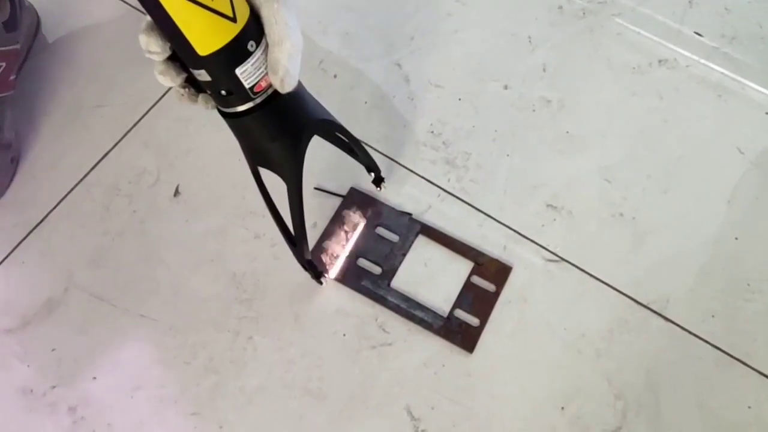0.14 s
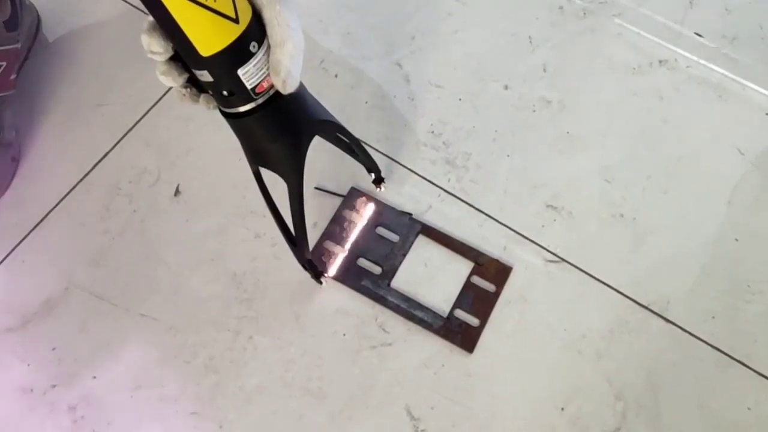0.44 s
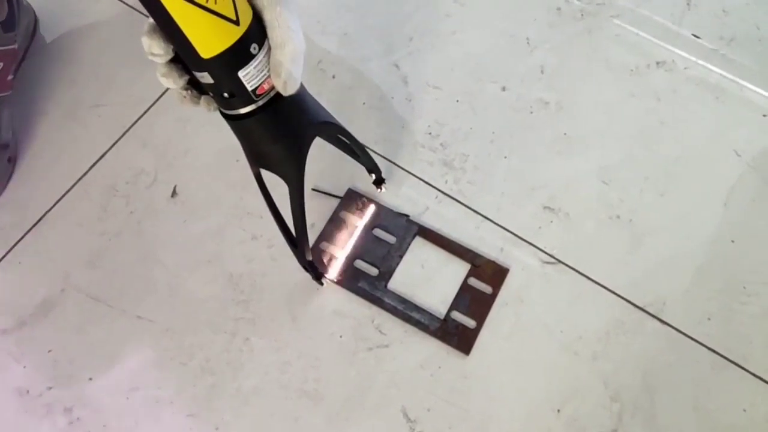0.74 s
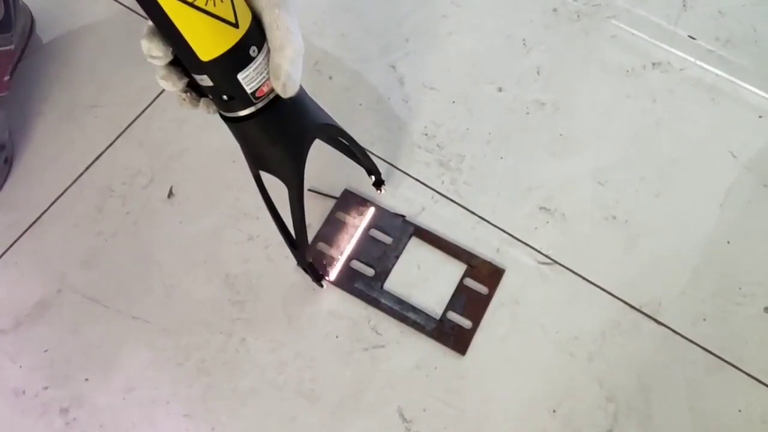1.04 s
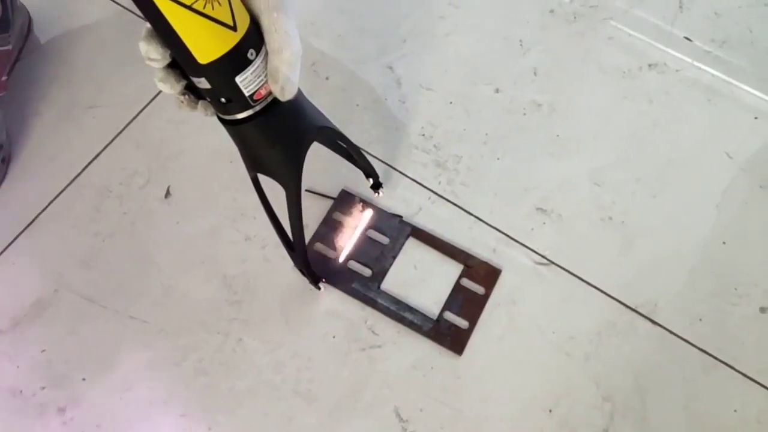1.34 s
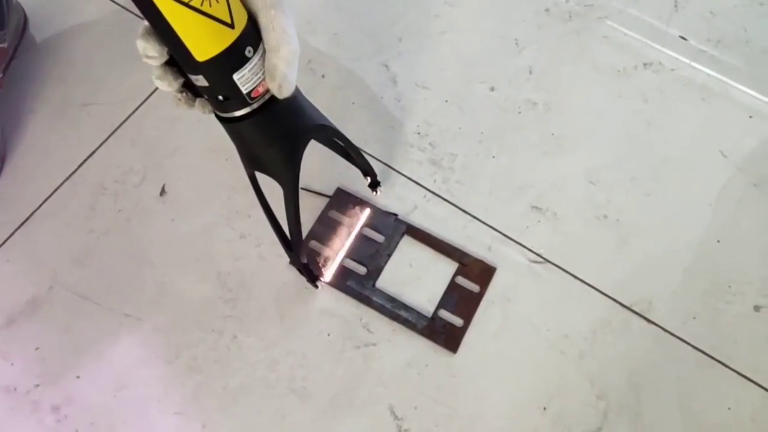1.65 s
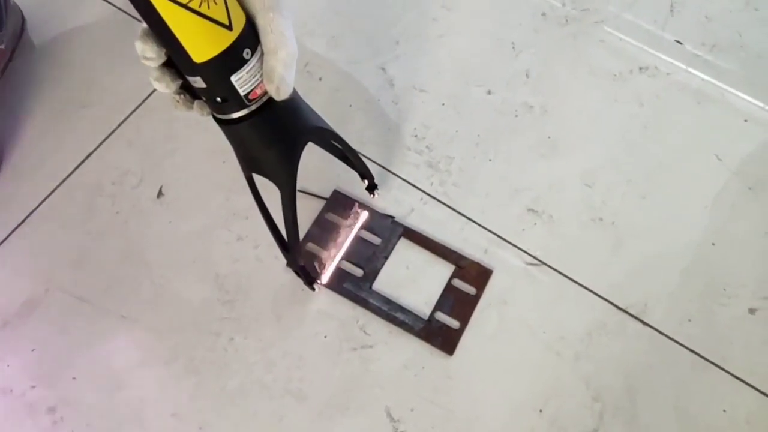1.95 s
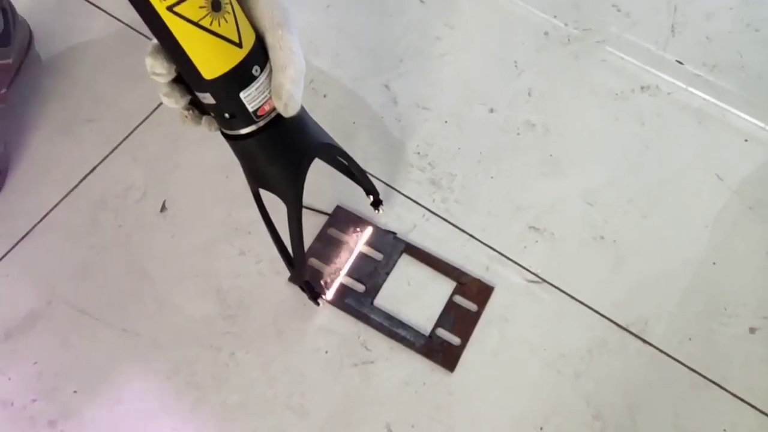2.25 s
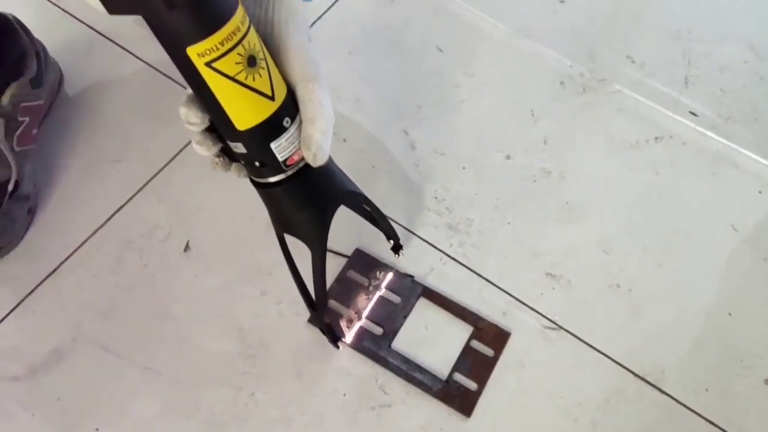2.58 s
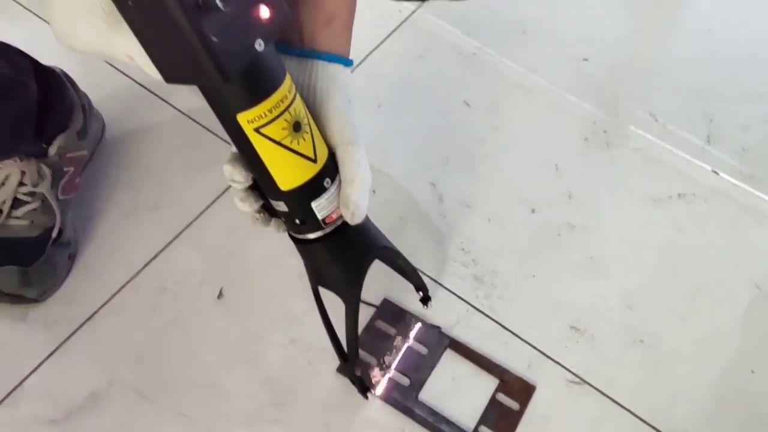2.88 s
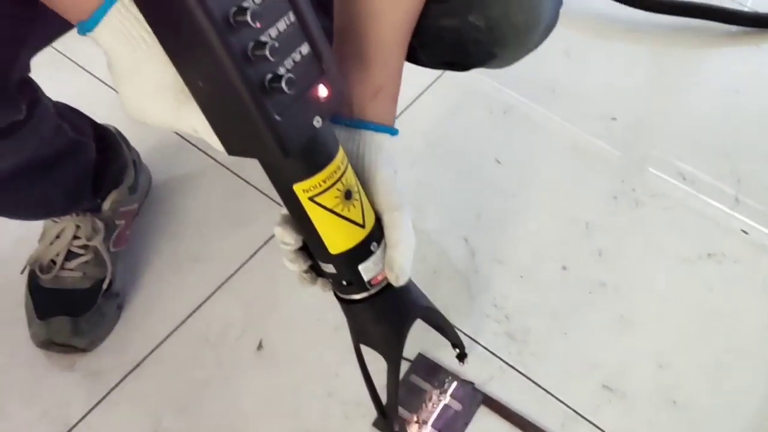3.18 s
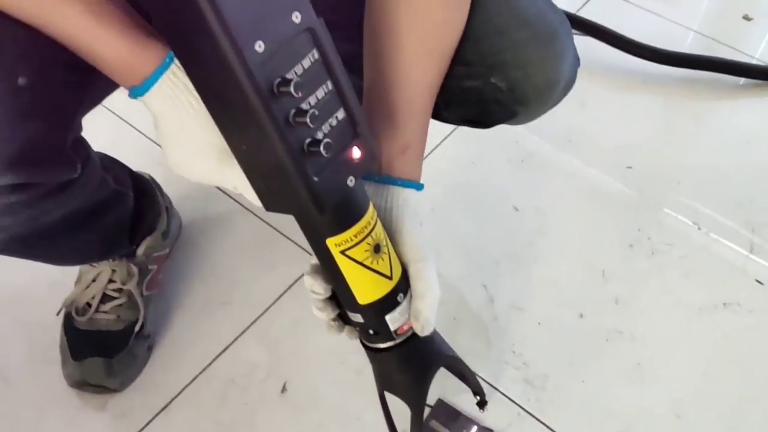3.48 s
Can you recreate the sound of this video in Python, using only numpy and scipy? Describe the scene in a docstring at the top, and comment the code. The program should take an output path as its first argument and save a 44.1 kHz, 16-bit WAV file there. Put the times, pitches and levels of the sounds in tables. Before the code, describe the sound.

A laser cleaner's harsh, buzzing sizzle burns rust off a steel plate, crackling, then fading

```python
"""A handheld laser cleaner burns rust off a steel plate in a workshop.
From the start a mirror sweeps the beam to and fro; each sweep meets nearly the same rust again, so filtered
noise repeats and buzzes, and flakes crackle as lone clicks. Sine overtones whine in the scanner, a wavering
sine hums in the machine, noise makes the room's air. Larger flakes pop now and then; past two seconds comes
one soft bump, then the head is lifted: the hiss fades and thins in a few narrow bands, and the plate rings."""
import sys
import numpy as np
from scipy import signal
from scipy.fft import rfft, irfft, next_fast_len
from scipy.io import wavfile

SR = 44100
rng = np.random.default_rng(int(sys.argv[2]) if len(sys.argv) > 2 else 0)


def to_wav(sig):
    """Store sig (one row per channel, or 1-D mono) as 16-bit WAV at the path in sys.argv[1].

    Samples outside -1..1 are clipped; the rate is SR.
    """
    pcm = np.clip(np.atleast_2d(sig), -1, 1) * 32767
    pcm = np.round(pcm).astype(np.int16)
    wavfile.write(sys.argv[1], SR, pcm.T)  # frames by channels


N = 159642
TIME = np.arange(N) / SR  # s
SIDES = np.array([[.5], [-.5]])  # half of a left-right difference for each ear
SCAN_HZ = 64.6  # sweeps of the beam per second
LIFT_S = 2.3  # the head starts to lift

# stereo likeness of the two ears: f/Hz, correlation (1 alike, 0 unrelated, -1 opposed)
EAR_LIKENESS = [(120, 1), (500, 0.86), (1150, 0.22), (1450, -0.11), (1750, -0.84), (2200, 0.58),
                (2900, 0.42), (3600, -0.19), (5400, 0.57), (7500, 0.033)]


def from_db(db):
    """Decibels to gain."""
    return 10 ** (np.asarray(db) / 20)


def rms_one(x):
    """Scale to rms 1."""
    return x / np.sqrt(np.mean(x ** 2) + 1e-20)


def in_time(rows):
    """Draw each column of a breakpoint table as a curve over every sample."""
    s, *columns = np.transpose(rows)
    return [np.interp(TIME, s, column) for column in columns]


def at_hz(points, hz):
    """Read a table on a log-frequency axis."""
    f, value = np.transpose(points)
    return np.interp(np.log(hz + 1), np.log(f), value)


def bins():
    """Frequencies of the filter grid in Hz."""
    return np.fft.rfftfreq(next_fast_len(N + 8192, True), 1 / SR)


def filtered(x, response):
    """Apply a response given on the filter grid."""
    size = next_fast_len(N + 8192, True)
    return irfft(rfft(x, size) * response, size)[..., :N]


def drift(rate_hz):
    """Smooth random wander of rms 1: noise rolled off above the rate."""
    return rms_one(filtered(rng.standard_normal(N), 1 / (1 + (bins() / rate_hz) ** 2)))


def stereo(pair):
    """Mix two unrelated signals as middle and side, so the ears' likeness varies with frequency."""
    alike = np.clip(at_hz(EAR_LIKENESS, bins()), -.98, .98)
    middle = filtered(pair[0], np.sqrt(1 + alike))
    side = filtered(pair[1], np.sqrt(1 - alike))
    return middle + side * [[1], [-1]]


def swept_rust():
    """Noise in a feedback loop one sweep long: it comes round again, slowly renewed as the rust burns away."""
    # how the sizzle repeats: f/Hz, share carried from one sweep to the next
    carry_curve = [(900, 0.8), (3000, 0.65), (6000, 0.57), (8500, 0.44), (12000, 0.22)]
    fresh = .18  # share of the power that is new in each sweep
    hz = bins()
    carry = at_hz(carry_curve, hz)
    one_sweep_later = np.exp(-2j * np.pi * hz / SCAN_HZ)
    loop = np.sqrt(1 - carry ** 2) / (1 - carry * one_sweep_later)
    old, new = rng.standard_normal((2, 2, N))
    return np.sqrt(1 - fresh) * filtered(old, loop) + np.sqrt(fresh) * new


def edge_flares_db():
    """The beam flares at the plate's edges: each crossing lifts the level at once, then dies away."""
    # edges: place in the sweep (0-1), flare at work/dB, flare lifted/dB
    edge_rows = [(.335, 6.5, 1), (.805, 1.5, 9)]
    decay_s = .0006
    flares = 0
    for place, work_db, lifted_db in edge_rows:
        age_s = ((TIME * SCAN_HZ - place) % 1) / SCAN_HZ
        flares = flares + np.where(TIME < LIFT_S, work_db, lifted_db) * np.exp(-age_s / decay_s)
    return flares


def reflected(x):
    """Short, slowly moving echoes add to the sizzle and shift its colour by interference."""
    # early reflections off floor, nozzle and hand: delay/s, gain/dB
    echo_rows = [(.0015, -3.5), (.0024, -8), (.0037, -7.5), (.0055, -4.5)]
    sway_s, sway_hz = .00008, 1  # the unsteady hand shifts the delays
    stretch_per_s = .1195  # they lengthen once the head is lifted
    stretch = 1 + stretch_per_s * np.maximum(TIME - LIFT_S, 0)
    out = x.copy()
    for delay_s, db in echo_rows:
        sent = TIME - delay_s * stretch - sway_s * drift(sway_hz)
        for ear in range(2):
            ear_sent = sent - .5 * sway_s * drift(sway_hz)
            out[ear] += from_db(db) * np.interp(ear_sent, TIME, x[ear])
    return out


def flakes():
    """Lone one-sample clicks of rust flaking off, at random times and sizes."""
    per_s, smallest_db, spread_db = 110, 2.5, 9  # sizes before colouring
    sizes = from_db(smallest_db + spread_db * np.minimum(rng.exponential(1, N), 2))
    clicks = rng.random(N) < per_s / SR
    return sizes * rng.choice([-1, 1], (2, N)) * clicks


def burn():
    """The swept sizzle with its crackle, coloured by plate and nozzle; the colour shifts as the head moves."""
    # the burn: t/s, level/dB, then shifts about their own mean: low mids/dB, upper mids/dB,
    # 8 kHz ring/dB, top treble/dB, left-right/dB
    burn_curve = [(0.02, -33, -12.5, -12.5, -2.5, -6.5, -2.5), (0.08, -30, -20.5, -11.5, -0.5, -6, -1),
                  (0.37, -27, -16.5, -11, -2, -7.5, 0.5), (0.48, -22.5, -18.5, -12.5, -1, -7, 0.5),
                  (0.73, -25.5, -16, -10.5, -1, -6.5, -0.5), (0.85, -21.5, -23.5, -14.5, -4, -10, -1),
                  (1.02, -28.5, -19.5, -11.5, 0.5, -4.5, -0.5), (1.24, -24, -23, -12.5, -0.5, -6.5, -1),
                  (1.75, -25, -25.5, -13, -2.5, -7, -1.5), (2.05, -23, -20, -15.5, -2, -10, 0),
                  (2.26, -28.5, -22.5, -13.5, 3.5, -8.5, 0), (2.35, -24.5, -20.5, -13, 1, -10, -1.5),
                  (3.0, -32, -23, -13, 0.5, -9.5, -1), (3.12, -30.5, -21.5, -14, 1.5, -9, -3),
                  (3.33, -39.5, -20, -14, 3, -6.5, -2), (3.54, -50, -25, -12, 7, -5.5, -1),
                  (3.59, -35.5, -25, -15, -1.5, -9.5, -4)]
    # colour of the sizzle: f/Hz, density (dB per Hz, relative)
    sizzle_colour = [(150, -48), (300, -26), (450, -43.5), (600, -30), (780, -38), (1000, -16.5),
                     (1250, -27.5), (1500, -18), (2100, -14.5), (2500, -17), (2800, -15), (4200, -14.5),
                     (5000, -9.5), (6200, -4.5), (7300, -1), (8150, -0.5), (9000, -2.5), (9800, -7.5),
                     (11200, -9.5), (12500, -10.5), (14200, -17)]
    # colour difference of the ears: f/Hz, left-right/dB
    ear_balance = [(500, 1.5), (2000, -1), (3500, 3), (5000, 1), (6500, -5), (7400, -0.5), (8150, -16),
                   (8900, 1.5), (9400, -2), (10200, -0.5), (11000, -10), (12000, -5), (13200, 0)]
    patchy_db, patchy_hz = 1.01, 8.4  # each zone also wanders by itself
    level, low, mids, ring, top, pan = in_time(burn_curve)
    hz = bins()
    sizzle = reflected(stereo(swept_rust())) * from_db(edge_flares_db())
    spark = sizzle + pops() + stereo(flakes())
    hiss = filtered(spark, from_db(at_hz(sizzle_colour, hz) + SIDES * at_hz(ear_balance, hz)))
    hiss = hiss / np.std(hiss.mean(axis=0))

    def swing(curve):
        """Shift of a curve about its mean, weighted by the burn's power."""
        return curve - np.average(curve, weights=from_db(2 * level))

    still = 0 * level
    zones = [(1400, low), (2000, mids), (2800, mids), (3800, mids), (5000, still), (7000, still),
             (7800, ring), (8700, ring), (9800, top)]  # centre Hz, curve
    centres = [centre for centre, _ in zones]
    out = 0
    for share, (_, curve) in zip(np.eye(len(zones)), zones):
        band = filtered(hiss, np.interp(hz, centres, share))  # triangles that overlap and sum to 1
        out = out + band * from_db(swing(curve) + patchy_db * drift(patchy_hz))
    return out * from_db(level + SIDES * swing(pan))


def thinned(x):
    """Narrow bands of the sizzle are thinned, with wandering centres; the thinning grows after 2.3 s."""
    # thinned bands: early f/Hz, late f/Hz, width/Hz (Gaussian), early gain/dB, late gain/dB
    band_rows = [(1830, 1560, 119, -5, -20), (3330, 3750, 210, -2, -3), (2590, 2300, 37, -2, -18),
                 (8800, 8530, 310, -2, -4.5)]
    wander_hz, wander_rate_hz, glide_s = 60, 11, .7
    late = np.clip((TIME - LIFT_S) / glide_s, 0, 1)
    for early_hz, late_hz, width, early_db, late_db in band_rows:
        centre = early_hz + (late_hz - early_hz) * late + wander_hz * drift(wander_rate_hz)
        phase = 2 * np.pi * np.cumsum(centre) / SR
        narrow = np.exp(-.5 * (bins() / width) ** 2)
        # shift the centre down to 0 Hz, keep what is close, shift it back
        band = 2 * sum(wave * filtered(x * wave, narrow) for wave in (np.cos(phase), np.sin(phase)))
        x = x + band * (from_db(early_db + (late_db - early_db) * late) - 1)
    return x


def scanner():
    """Whine of the beam's swing: sine overtones of the scan rate that swell, waver and fade."""
    # overtones: multiple of the scan rate, start t/s, end t/s, rms level/dB
    overtone_rows = [(9, .12, .68, -61), (10, 2.3, 2.8, -64), (11, 1.5, 2.2, -67), (14, .3, 3.2, -68),
                     (15, -.1, .95, -56), (15, .95, 2.3, -64), (17, .3, 1.0, -57)]
    waver_db, waver_hz, swell_s = 2, 26.0, .25
    out = 0
    for k, start, end, db in overtone_rows:
        gate = np.clip(np.minimum(TIME - start, end - TIME) / swell_s + .5, 0, 1)
        apart = np.arccos(at_hz(EAR_LIKENESS, k * SCAN_HZ)) * SIDES  # phase between the ears, rad
        tone = np.sin(2 * np.pi * (k * SCAN_HZ * TIME + rng.random()) + apart)
        out = out + gate * from_db(db + waver_db * drift(waver_hz)) * tone
    return np.sqrt(2) * out


def hum():
    """The machine's low hum, a sine of wandering pitch, swells and sinks; it leads in the left ear."""
    # the hum wavers: t/s, rms level/dB
    hum_curve = [(0.0, -57), (0.2, -73), (0.24, -58), (0.42, -69), (0.47, -58), (0.71, -69), (0.77, -55),
                 (1.16, -69), (1.31, -57), (1.45, -75), (1.6, -52), (1.73, -74), (2.09, -54), (2.23, -72),
                 (2.61, -52), (2.66, -62), (2.91, -52), (2.95, -66), (3.04, -53), (3.31, -69), (3.46, -56),
                 (3.54, -57), (3.62, -74)]
    pitch_hz, wander_hz, wander_rate_hz = 140.0, 1.2, 2.6
    lead_rad = .25
    db, = in_time(hum_curve)
    phase = 2 * np.pi * np.cumsum(pitch_hz + wander_hz * drift(wander_rate_hz)) / SR
    return np.sqrt(2) * from_db(db) * np.sin(phase + lead_rad * np.array([[1], [0]]))


def air():
    """Faint noise of the workshop, coloured and uneven in level."""
    # workshop air: f/Hz, density (dB per Hz, relative)
    air_colour = [(30, -3), (65, 3), (110, 10), (200, 3), (450, 2), (1000, 4), (3000, -20), (14000, -11)]
    level_db, waver_db, waver_hz = -65, 4.0, 6
    noise = stereo(rng.standard_normal((2, N)))
    noise = rms_one(filtered(noise, from_db(at_hz(air_colour, bins()))))
    return from_db(level_db + waver_db * drift(waver_hz)) * noise


def pops():
    """Single sharp cracks of the larger flakes: one-sample pulses, coloured along with the sizzle."""
    # pops: t/s, height before colouring/dB
    pop_rows = [(.811, 23), (1.119, 21), (1.893, 22), (2.875, 24), (3.015, 28)]
    return sum(from_db(db) * (np.arange(N) == int(s * SR)) for s, db in pop_rows)


def bump():
    """One soft, dull knock: a single push and pull of air."""
    middle_s, peak_db, width_s = 2.1078, -39.5, .00088
    age = (TIME - middle_s) / width_s
    return -from_db(peak_db) * age * np.exp(.5 * (1 - age ** 2))


def plate():
    """The swept beam keeps a few narrow modes of the plate ringing while the hiss fades."""
    # modes: f/Hz, width/Hz, rms level while ringing/dB
    mode_rows = [(1750, 37, -59), (2930, 80, -62), (7080, 130, -46), (8030, 110, -59), (8900, 180, -49)]
    middle_s, half_length_s = 3.34, .1
    pair = swept_rust()
    moment = np.exp(-.5 * ((TIME - middle_s) / half_length_s) ** 2)
    drive = (pair + .5 * pair[::-1]) * moment
    rings = 0
    for hz, width, db in mode_rows:
        resonance = 1 / (1 + 1j * (bins() - hz) / width) ** 2
        rings = rings + from_db(db) * rms_one(filtered(drive, resonance))
    # from rms over the moment to rms over the whole scene
    return rings * np.sqrt(2 * half_length_s * SR / N)


def scene():
    """The burn and the ringing plate over the machine and the room."""
    return thinned(burn()) + scanner() + hum() + air() + bump() + plate()


def record(dry):
    """The top is cut steeply."""
    cutoff_hz, slope_db_per_hz = 14280, .4
    cut_db = np.clip((bins() - cutoff_hz) * slope_db_per_hz, 0, 100)
    return filtered(dry, from_db(-cut_db))


dry = scene()
out = record(dry)
to_wav(out)
```